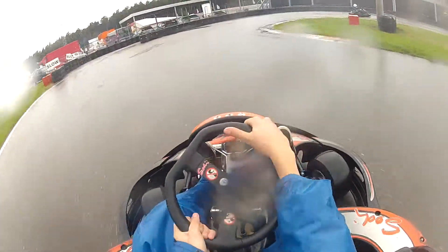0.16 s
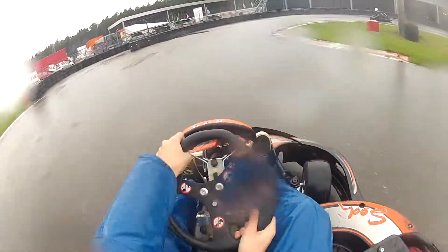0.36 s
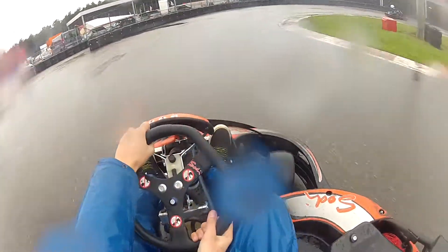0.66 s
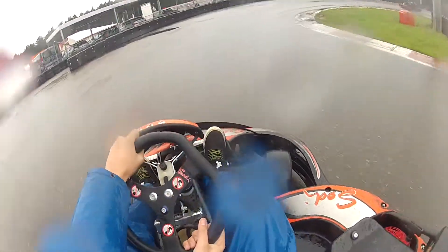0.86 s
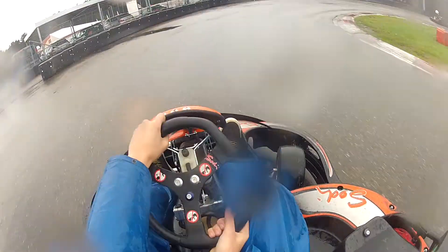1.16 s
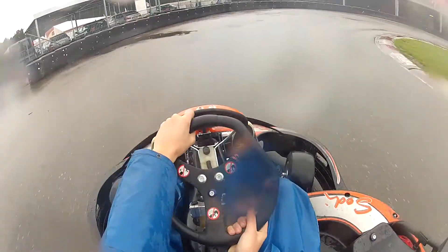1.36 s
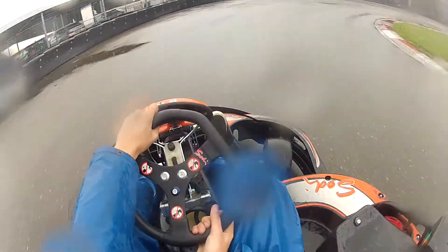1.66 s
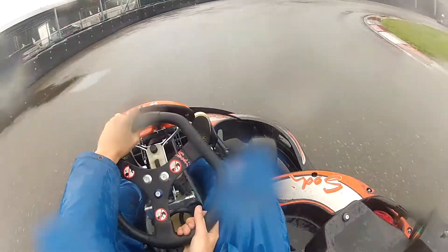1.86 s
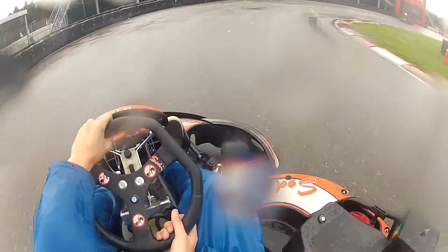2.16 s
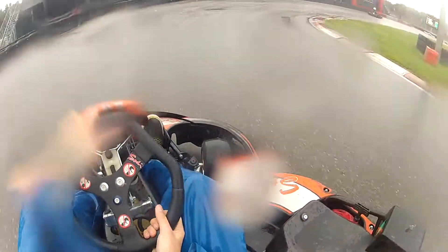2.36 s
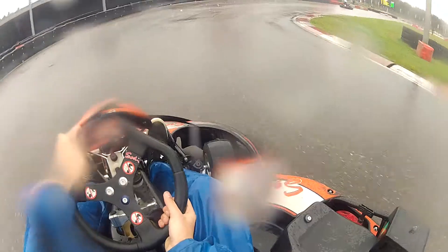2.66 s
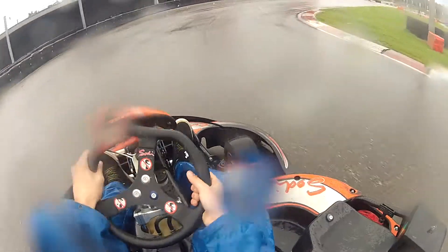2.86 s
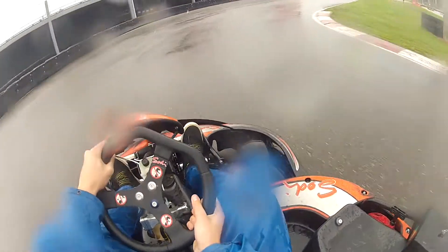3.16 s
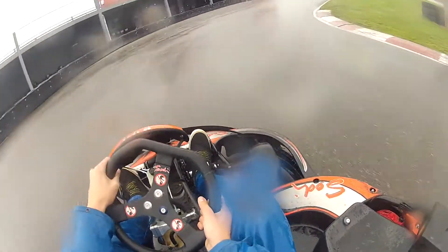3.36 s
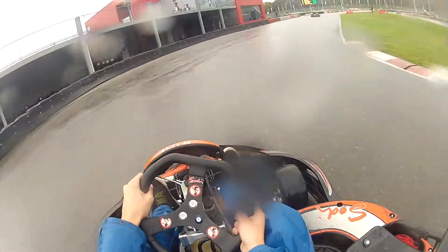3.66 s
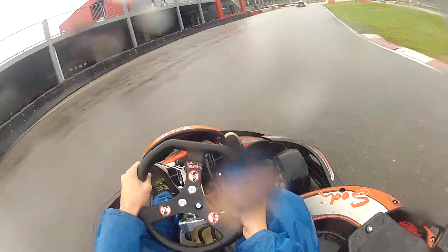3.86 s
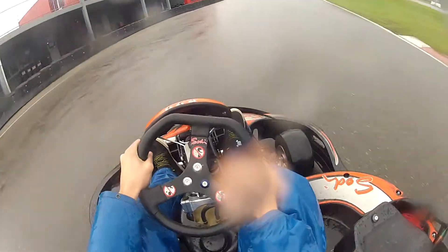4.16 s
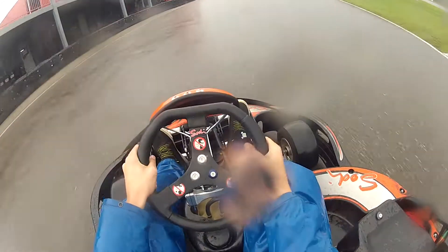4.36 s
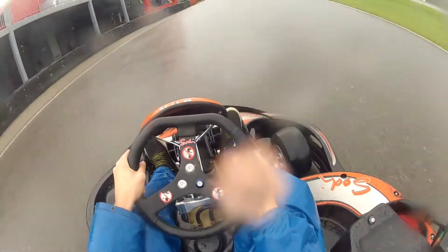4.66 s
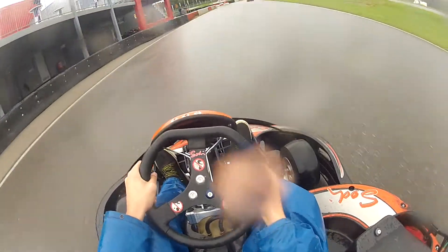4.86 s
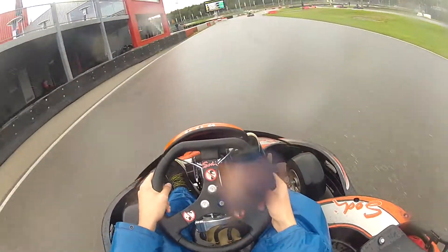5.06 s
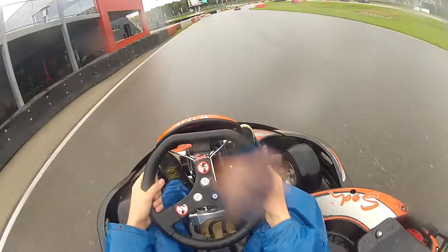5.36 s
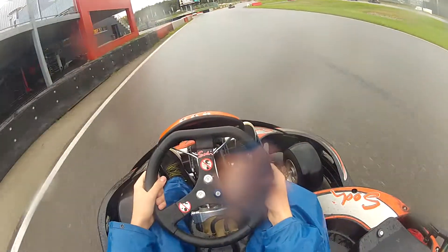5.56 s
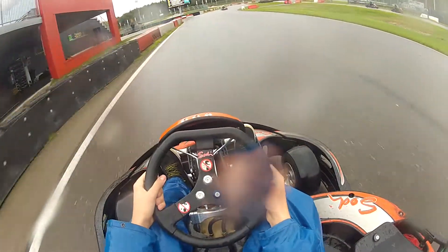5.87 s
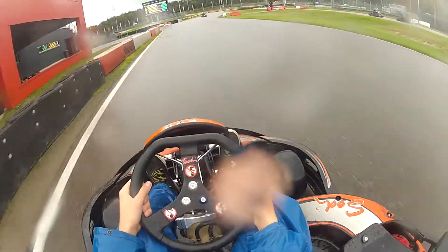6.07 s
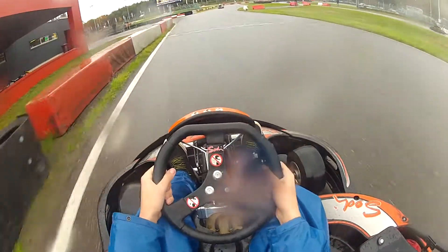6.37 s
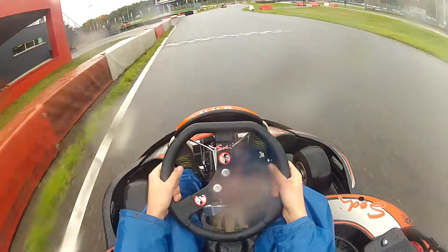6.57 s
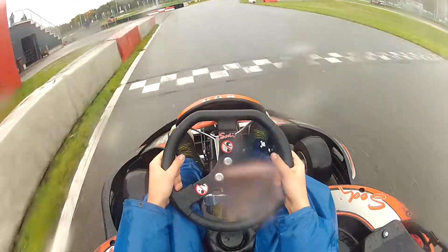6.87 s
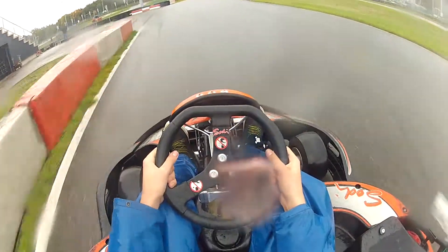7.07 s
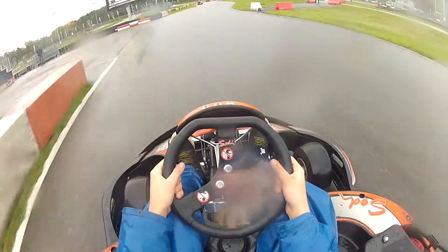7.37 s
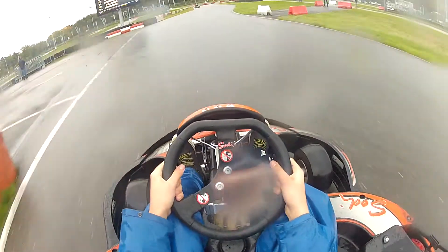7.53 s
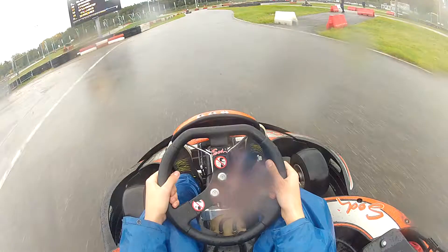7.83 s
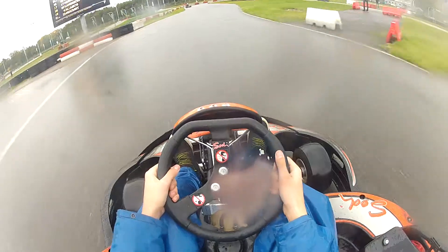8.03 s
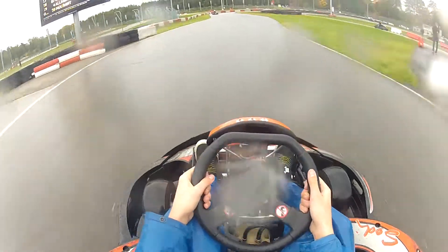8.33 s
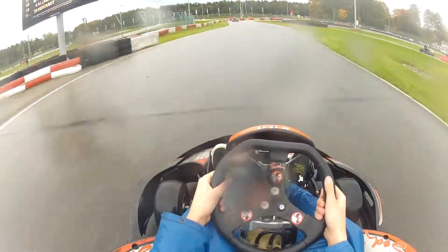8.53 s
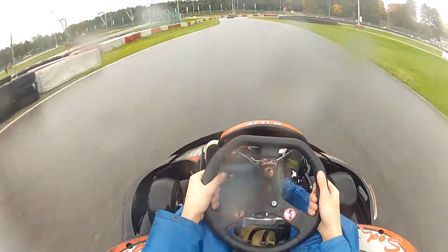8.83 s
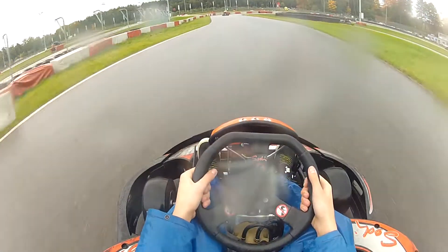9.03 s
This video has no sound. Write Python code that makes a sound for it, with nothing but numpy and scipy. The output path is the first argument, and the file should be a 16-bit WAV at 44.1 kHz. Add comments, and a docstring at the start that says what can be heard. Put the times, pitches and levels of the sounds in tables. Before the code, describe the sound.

Heard close up from a microphone riding with the driver, a go-kart runs on a wet track. The engine revs for a moment, falls back to a quiet, lumpy putter, then opens up and holds a rattling drone before rising further. Scattered small ticks, a whining chain and soft tyre spray sit underneath. As speed and rumble build, bumps clack and thump the microphone's mount several times in quick succession.

```python
"""Kart on a wet track

A four-stroke single, heard from a cased camera riding with the driver. The engine pulls, drops to idle
for a corner, then pulls against its slipping clutch until the clutch grips and the revs climb.
Gas puffs sound the exhaust; pistons, valves and firings ring the block. The chain whines up with
wheelspin and road speed, the tyres spray, and at speed bumps knock the camera in its mount."""
import sys
import numpy as np
from scipy import signal
from scipy.fft import rfft, irfft, next_fast_len
from scipy.io import wavfile
from scipy.ndimage import map_coordinates

SR = 44100
rng = np.random.default_rng(int(sys.argv[2]) if len(sys.argv) > 2 else 0)


def to_wav(s):
    """Save 16-bit WAV."""
    ch = np.atleast_2d(s).T  # columns
    pcm = np.round(np.clip(ch, -1, 1) * 32767)  # PCM
    wavfile.write(sys.argv[1], SR, pcm.astype(np.int16))


N = 405719
TIME = np.arange(N) / SR

# block clatter spectrum: f/Hz, level/dB
CLATTER_SPECTRUM = [(150, -66), (400, -6), (700, -1.5), (830, -9), (950, 0.5), (1500, -2.5), (2720, -7.5),
                    (2950, -9), (4300, -13), (5400, -16.5), (6100, -30), (6700, -17.5), (10500, -17),
                    (12000, -17), (14000, -18)]
# resonances of engine block and camera case: f/Hz, width/Hz, lift/dB
BLOCK_MODES = [(995, 77, 3.4), (1790, 55, 8.9), (2100, 130, 9.3), (2425, 250, 5.1), (3590, 560, 3.4)]
CASE_MODES = [(8340, 470, 8.5), (9780, 720, 9.5), (14200, 360, 11)]


def from_db(db):
    """Decibels to gain."""
    return 10 ** (np.asarray(db) / 20)


def unit_rms(x):
    """Scale to unit power."""
    return x / np.sqrt(np.mean(x ** 2) + 1e-20)


def curve(rows, x=TIME):
    """Interpolate a two-column table."""
    return np.interp(x, *np.transpose(rows))


def bell(t_s, half_s):
    """Gaussian swell of height 1."""
    return np.exp(-((TIME - t_s) / half_s) ** 2)


def drift(rate_hz):
    """Smooth random wander, unit spread."""
    knots = rng.standard_normal(int(N / SR * rate_hz) + 4)
    return unit_rms(map_coordinates(knots, [TIME * rate_hz], order=2, mode="nearest"))


def colour(x, spectrum, resonances=()):
    """Shape by a smooth spectrum plus bell-shaped resonances; unit power."""
    size = next_fast_len(N + SR // 4)
    hz = np.maximum(np.fft.rfftfreq(size, 1 / SR), 1)
    points_hz, levels_db = np.transpose(spectrum)
    db = np.interp(np.log(hz), np.log(points_hz), levels_db)
    for centre_hz, width_hz, lift_db in resonances:
        db += lift_db * np.exp(-2 * ((hz - centre_hz) / width_hz) ** 2)
    rolloff = 1 / (1 + (points_hz[0] / 2 / hz) ** 2) / (1 + (hz / 2 / points_hz[-1]) ** 2)
    return unit_rms(irfft(rfft(x, size) * from_db(db) * rolloff, size)[:N])


def butter(x, hz, kind):
    """Butterworth filter, order 2."""
    return signal.sosfilt(signal.butter(2, hz, kind, fs=SR, output="sos"), x)


def narrow_noise(hz, width_hz):
    """Noise through one resonance; unit power."""
    return unit_rms(butter(rng.standard_normal(N), [hz - width_hz / 2, hz + width_hz / 2], "band"))


def clicks(times_s, gains):
    """Single-sample impulses."""
    return np.bincount(np.clip(np.asarray(times_s) * SR, 0, N - 1).astype(int), gains, N) + 1e-18


def fade(x, decay_s):
    """Give each impulse an exponential tail."""
    return signal.lfilter([1], [1, -np.exp(-1 / (decay_s * SR))], x)


def ring(x, hz, t60_s):
    """Give each impulse a decaying sine."""
    r, w = from_db(-60 / (t60_s * SR)), 2 * np.pi * hz / SR
    return signal.lfilter([0, np.sin(w)], [1, -2 * r * np.cos(w), r * r], x)


def rev_gain(firing_hz, load, db, doubling_db, shut_db):
    """Gain rising with revs: db at 28 firings/s, full load; shut_db added at no load."""
    return from_db(db + doubling_db * np.log2(firing_hz / 28) + shut_db * (1 - load))


def speed_gain(mesh_hz, db, doubling_db):
    """Gain rising with road speed: db at 784 teeth/s."""
    return from_db(db + doubling_db * np.log2(mesh_hz / 784))


def motion():
    """The engine runs free until the sprocket catches up and the clutch grips."""
    # firing rate, clutch open or slipping: t/s, f/Hz
    free_revs = [(0, 21.36), (.19, 25.65), (.38, 27.01), (.523, 25.27), (.877, 15.5), (1.62, 15.55),
                 (1.88, 13.5), (2.29, 16.85), (2.522, 23.48), (2.745, 26.22), (3.2, 27.2), (3.48, 27.01),
                 (3.94, 27.9)]
    # road speed as tooth mesh rate: t/s, f/Hz
    road_speed = [(0, 400), (.4, 420), (2.3, 330), (3.5, 450), (4.7, 528), (5.3, 592), (6.6, 722),
                  (7.6, 818), (8.4, 885), (9.2, 942)]
    # throttle pedal: pressed/s, lifted/s
    pedal = [(-1, .39), (2.23, 10)]
    teeth_per_firing, grip_hz = 28, .65
    open_s, shut_s, overrun_s = .24, .06, .33
    mesh_hz = curve(road_speed)
    locked_hz = mesh_hz / teeth_per_firing
    firing_hz = grip_hz * np.logaddexp(curve(free_revs) / grip_hz, locked_hz / grip_hz)  # soft maximum
    load = sum(np.interp(TIME, [down, down + open_s, up, up + shut_s], [0, 1, 1, 0])
               for down, up in pedal)
    slip = load * (1 - locked_hz / firing_hz)
    lift_s = pedal[0][1]
    overrun = np.interp(TIME, [lift_s, lift_s + overrun_s], [.5, 0])  # exhaust burbles on
    gas_flow = np.maximum(load, overrun)
    return firing_hz, mesh_hz, load, slip, gas_flow


def exhaust(cycles, firing_hz, load, uneven_db=.36, idle_uneven_db=2.5, waver_db=2):
    """Gas puffs make harmonics that slide through the silencer's resonances; dull and uneven at idle."""
    # gas puffs: place/cycle, strength
    puffs = [(0.252, 0.46), (0.409, 0.21), (0.715, 0.82), (0.9, 0.39)]
    # one row per harmonic: ratio (unused), low-rev level/dB, high-rev level/dB
    harmonics = [(1, -5, -4), (2.01, 9, 9.5), (3.006, 4.5, 0.5), (3.94, -23, -25), (5, -5, 1),
                 (6.05, 6, 6.5), (7.04, 1, 3.5), (8.05, -2, -1), (9, -1.5, 2), (10, 3, -12), (10.92, 3, 4),
                 (12, -1, -9), (13.07, 5, -1), (14.06, 1, 4.5), (15, -1, -4), (16.16, 3.5, 4),
                 (17.1, 2.5, 4), (18.02, 0, -9), (18.95, 1.5, 0), (20.06, 1.5, 4), (21, -9.5, -9),
                 (22.03, -2.5, -3), (22.95, -4, -3), (24.1, -5, -3), (24.9, -4.5, 3), (26.14, -20, -2),
                 (27.1, -5, -11), (28, -17, -10), (29, -17, -14), (30, -19, -14), (31, -14, -9),
                 (31.9, -4, 2), (33, -11, 2.5)]
    # silencer and air box response: f/Hz, level/dB
    silencer = [(30, -22), (58, -9.5), (85, 6.5), (115, -5), (180, -1.5), (230, 0.5), (295, 5), (345, -1.5),
                (420, 0.5), (490, -5), (555, 3.5), (610, -6.5), (700, -10.5), (800, -11.5)]
    boom_hz, shut_db_per_octave = 80, -2.5
    place, strength = np.transpose(puffs)
    high_revs = np.interp(firing_hz, [27.2, 27.8], [0, 1])
    note = np.zeros(N)
    for k, (_, low_db, high_db) in enumerate(harmonics, 1):
        phase = np.angle(strength @ np.exp(-2j * np.pi * k * place))
        db = low_db + (high_db - low_db) * high_revs + curve(silencer, k * firing_hz)
        db += shut_db_per_octave * (1 - load) * np.log2(np.maximum(k * firing_hz / boom_hz, 1))
        waver = np.interp(TIME, np.linspace(0, TIME[-1], 60), rng.standard_normal(60))
        note -= from_db(db + waver_db * waver) * np.cos(2 * np.pi * k * cycles + phase)
    burn = np.interp(cycles, np.arange(300), rng.standard_normal(300))
    return unit_rms(note) * from_db(burn * (uneven_db + idle_uneven_db * (1 - load)))


def clatter(cycles, slip, uneven_db=1.4, jitter_s=3e-5, rise_s=.0015, repeat_db=-1.5, steady_db=-6.5):
    """Knocks ring the block, part alike each cycle, part fresh rattle. Slap stands out under slip."""
    # piston slap, rebound, exhaust valve, intake valve:
    # place/cycle, level/dB, decay/s, change at full slip/dB
    knocks = [(.22, 3.5, 0.0073, -2), (.45, 1, 0.0074, -8.5), (.72, 0.5, 0.0079, -11),
              (.97, 0.5, 0.0066, -19)]
    count = np.arange(int(cycles[-1]))
    repeating, power = np.zeros(N), np.zeros(N)
    tail_s = TIME[:SR // 16]
    for place, db, decay_s, slip_db in knocks:
        timing, force = rng.standard_normal((300, 2))[count].T
        times_s = np.interp(count + place, cycles, TIME) + jitter_s * timing
        hits = clicks(times_s, from_db(db + slip_db * np.interp(times_s, TIME, slip) + uneven_db * force))
        burst = (1 - np.exp(-tail_s / rise_s)) * np.exp(-tail_s / decay_s)
        repeating += signal.oaconvolve(hits, rng.standard_normal(len(tail_s)) * burst)[:N]
        power += signal.oaconvolve(hits ** 2, burst ** 2)[:N]
    rattle = np.sqrt(np.abs(power) + from_db(steady_db) ** 2) * rng.standard_normal(N)
    return colour(rattle + from_db(repeat_db) * repeating, CLATTER_SPECTRUM, BLOCK_MODES + CASE_MODES)


def combustion(cycles, load, place=.165, level_db=-9.5, uneven_db=1, jitter_s=1e-4, idle_db=-9):
    """Each firing's pressure jump rings the cylinder, harder under load."""
    # cylinder modes: f/Hz, level/dB, t60/s
    modes = [(1755, 5.5, 0.044), (1972, 10, 0.049), (2220, 10, 0.01), (2228, 5, 0.062), (2660, 6.5, 0.053),
             (3600, -16, 0.016)]
    count = np.arange(int(cycles[-1]))
    timing, force = rng.standard_normal((300, 2))[count].T
    times_s = np.interp(count + place, cycles, TIME) + jitter_s * timing
    force_db = level_db + uneven_db * force + idle_db * (1 - np.interp(times_s, TIME, load))
    out = np.zeros(N)
    for k, (hz, db, t60_s) in enumerate(modes):
        scatter_db = 3 * rng.standard_normal(300)[count]
        out += (-1) ** k * ring(clicks(times_s, from_db(force_db + db + scatter_db)), hz, t60_s)
    return out


def rocker_taps(cycles, width_cycles=.079):
    """Envelope of four rocker taps a cycle, varying in strength."""
    # taps: place/cycle, level/dB
    taps = [(0.28, -1), (0.51, -2), (0.723, -1), (.01, -3)]
    envelope = np.zeros(N)
    for place, db in taps:
        distance = np.sin(np.pi * (cycles - place)) / (2 * np.pi * width_cycles)
        envelope += from_db(db + drift(25)) * np.exp(-2 * distance ** 2)
    return envelope


def rocker_cover(tapping, level_db=-12.5, waver_db=2.5, between_taps=.3):
    """Each tap rings the cover; a little ring remains between taps."""
    ringing = unit_rms((between_taps + tapping) * narrow_noise(hz=3665, width_hz=310))
    return ringing * from_db(level_db + waver_db * drift(5.5))


def valve_gear(cycles, level_db=-45.5, swing_db=3.5, place=.25):
    """Light rattle at any load, swelling once per crank turn."""
    # rattle: f/Hz, level/dB
    spectrum = [(200, 6), (330, 5.5), (450, 1.5), (560, 4.5), (800, -18), (1050, -0.5), (1600, -14),
                (2250, -1.5), (3000, -13), (3650, -1), (4400, -16), (6000, -52)]
    swell = from_db(swing_db * np.cos(4 * np.pi * (cycles - place)))
    return from_db(level_db) * colour(swell * rng.standard_normal(N), spectrum)


def chain(cycles, mesh_hz, wobble_hz=2, flutter_db=.5, throb=.51, spin_db=3.5):
    """Links meet the sprocket in a rough whine: surging each firing, higher and louder in wheelspin."""
    # wheelspin on the wet: t/s, added mesh rate/Hz
    wheelspin = [(0, 140), (.08, 190), (.17, 232), (.28, 268), (.38, 240), (.45, 178), (.53, 185),
                 (.58, 110), (.64, 0)]
    # whine and its octave through the guard's resonances: mesh rate/Hz, level/dB
    fundamental = [(330, -75), (560, -44.5), (600, -46), (660, -42), (690, -48), (740, -44), (790, -34),
                   (835, -39.5), (905, -32), (950, -42)]
    octave = [(330, -75), (500, -59), (535, -39.5), (565, -49.5), (600, -53), (690, -47), (765, -39.5),
              (800, -45), (840, -43), (875, -36), (915, -54)]
    spin_hz = curve(wheelspin)
    whine_hz = mesh_hz + spin_hz
    phase = 2 * np.pi * np.cumsum(whine_hz + wobble_hz * drift(45)) / SR
    whine = sum(from_db(curve(levels, whine_hz) - flutter_db * drift(25)) * np.sin(k * phase)
                for k, levels in enumerate((fundamental, octave), 1))
    surge = 1 + throb * np.cos(2 * np.pi * cycles)
    return whine * surge * from_db(spin_db * (spin_hz / spin_hz.max()) ** 2)


def drive_ring(tapping, waver_db=.5):
    """A thin steel drive part rings in time with the engine, in swells."""
    # swells: t/s, half length/s, lift/dB
    swells = [(3.374, 0.25, 5.5), (4.65, 0.45, 1), (7.35, 0.65, 5.5)]
    swell_db = sum(db * bell(t_s, half_s) for t_s, half_s, db in swells)
    ringing = unit_rms(tapping * narrow_noise(hz=2403, width_hz=214))
    return ringing * from_db(swell_db + waver_db * drift(8))


def sprocket(cycles, swing_db=2, place=.33):
    """Rollers keep the sprocket ringing, most when a firing snatches the chain."""
    snatch = from_db(swing_db * np.cos(2 * np.pi * (cycles - place)))
    return snatch * narrow_noise(hz=2036, width_hz=220)


def spray(grain_db=2):
    """Fine water off the tyres: grainy hiss."""
    # hiss: f/Hz, level/dB
    spectrum = [(500, 8.5), (3500, 6), (5300, 6), (6100, -9), (6800, 5), (11000, -4), (15000, -1)]
    return colour(rng.standard_normal(N) * from_db(grain_db * drift(900)), spectrum, CASE_MODES)


def chassis(firing_hz, mesh_hz, load, lumpy_db=2.5):
    """Frame rumble, seat boom, mount shudder: engine-driven at first, by air and road at speed."""
    # frame and mount spectra: f/Hz, level/dB
    frame_spectrum = [(15, -26), (28, -29), (40, -22), (52, 2), (64, -17.5), (100, -24), (200, -28),
                      (600, -36)]
    mount_spectrum = [(50, 0), (98, -6), (124, 3), (150, 0), (186, 6), (225, -5), (275, 3.5), (340, -2.5),
                      (480, -33), (650, -15), (900, -12), (2000, -41)]
    # swells and ebbs: t/s, half length/s, rumble/dB, boom/dB, shudder/dB
    swells = [(.1, .12, -6, 6, 2), (.42, 0.13, 1, 11, 5), (0.727, .14, 2, 8.5, 1.5),
              (2.15, 0.23, -2, -10, 1.5), (2.85, .2, 6, -0.5, 8), (3.7, 0.56, 3, 3, 1.5),
              (5.15, 0.29, 9.5, -9, .5), (5.617, 0.25, 3, -6, 5), (6.606, 0.061, 3, 8, 2),
              (7.5, 0.49, 2.5, 0.5, -2), (9.125, 0.16, 0.5, -4, -9.5)]
    rumble = colour(rng.standard_normal(N), frame_spectrum)
    boom = narrow_noise(hz=78.7, width_hz=14.7)
    shudder = colour(rng.standard_normal(N) * from_db(lumpy_db * drift(70)), mount_spectrum)
    rumble *= np.hypot(rev_gain(firing_hz, load, db=-38.5, doubling_db=13.5, shut_db=0),
                       speed_gain(mesh_hz, db=-30, doubling_db=35))
    boom *= np.hypot(rev_gain(firing_hz, load, db=-42, doubling_db=11.5, shut_db=1.5),
                     speed_gain(mesh_hz, db=-32, doubling_db=27))
    shudder *= np.hypot(rev_gain(firing_hz, load, db=-42, doubling_db=3, shut_db=-1),
                        speed_gain(mesh_hz, db=-31, doubling_db=30.5))
    rumble_db, boom_db, shudder_db = sum(np.outer(lifts_db, bell(t_s, half_s))
                                         for t_s, half_s, *lifts_db in swells)
    return from_db(rumble_db) * rumble + from_db(boom_db) * boom + from_db(shudder_db) * shudder


def squeaks():
    """Short swells of one hoarse resonance on turning into the corner."""
    # squeaks: t/s, half length/s, level/dB
    events = [(.765, .025, -45), (.87, .012, -53)]
    envelope = sum(from_db(db) * bell(t_s, half_s) for t_s, half_s, db in events)
    return envelope * narrow_noise(hz=1310, width_hz=130)


def ticks(gain_db=2.5):
    """Short ticks, clicks and splashes on the kart: very short noise bursts."""
    # ticks: t/s, level/dB, decay/s
    events = [(1.185, -41.5, .008), (1.804, -40.5, .006), (1.84, -37, .004), (2.0, -35, 0.0022),
              (2.1183, -33, 0.0032), (2.2027, -30, 0.0019), (2.292, -30, 0.0014), (2.358, -37, 0.009),
              (2.594, -27.5, .005), (3.01, -29, 0.0015), (3.689, -28, 0.0099), (5.109, -26.5, 0.0011),
              (6.113, -22, 0.00098)]
    envelope = sum(fade(clicks([t_s], [from_db(db)]), decay_s) for t_s, db, decay_s in events)
    bursts = envelope * rng.standard_normal(N)
    return from_db(gain_db) * bursts.std() * colour(bursts, CLATTER_SPECTRUM, BLOCK_MODES + CASE_MODES)


def mount_mode(hz, db, t60_s, spread):
    """One decaying mode, randomly detuned: the mount never seats the same way twice."""
    tail_s = TIME[:SR // 4]
    detuned_hz = hz * (1 + spread * rng.standard_normal())
    return from_db(db - 60 * tail_s / t60_s) * np.sin(2 * np.pi * detuned_hz * tail_s)


def bumps(mount_gain_db=1.5, crack_gain_db=-5.5, buzz_gain_db=-12.5, vary_db=2, spread=.042):
    """Bumps clack the mount, crack if hard, and leave it swinging with a thud; the case buzzes."""
    # bumps: t/s, clack/dB, crack/dB, thud/dB, thud t60/s
    events = [(6.579, -28, -45, -34, .1), (6.898, -24, -40, -18, 0.22), (7.078, -5, -12, -7.5, 0.15),
              (7.446, -34, -45, -16, 0.14), (7.654, -24, -40, -17, 0.2), (7.852, -21, -32, -17.5, 0.19),
              (7.946, -9, -9, -9, 0.16), (8.02, -13, -17, -12.5, 0.1), (8.077, -15, -23, -10, 0.16),
              (8.2679, -1.5, -8.5, -4, .1), (8.312, -22, -36, -14, .05), (8.3499, -5, -11, -5.5, 0.15),
              (8.488, -15, -22, -12.5, .087), (8.627, -2.5, -2.5, -5, 0.09), (8.81, -3, 1.5, -3.5, 0.12),
              (8.83, -7, -24, -5, 0.094), (8.8469, 0.5, -2, -1, 0.14), (8.868, -6.5, -22, -7, 0.086),
              (8.904, -10, -17, -10, 0.11)]
    # mount's thud modes: f/Hz, level/dB, share of t60
    thud_modes = [(122, -11, 0.67), (174, -6, 0.75), (270.5, 0, 0.97)]
    # mount's clack modes: f/Hz, level/dB, t60/s, sign of first swing
    clack_modes = [(567, -3, 0.02, 1), (737, -1, 0.019, -1), (930, -19, 0.01, -1)]
    # dry crack: f/Hz, level/dB
    crack_spectrum = [(700, -5), (1150, 2), (1500, -21), (2000, -5), (2800, -36), (4000, -32), (8000, -49)]
    touch_lead_s, touch_db = .0017, -8.5  # light contact before the mount hits home
    mount = np.zeros(N + SR)
    for t_s, clack_db, _, thud_db, thud_t60_s in events:
        strikes_db = clack_db + vary_db * rng.standard_normal(len(clack_modes))
        thud = sum(mount_mode(hz, thud_db + db, thud_t60_s * share, spread / 2)
                   for hz, db, share in thud_modes)
        clack = sum(sign * mount_mode(hz, strike_db + db, t60_s, spread)
                    for (hz, db, t60_s, sign), strike_db in zip(clack_modes, strikes_db))
        hit, touch = int(t_s * SR), int((t_s - touch_lead_s) * SR)
        mount[hit:hit + len(clack)] += thud + clack
        mount[touch:touch + len(clack)] += from_db(touch_db) * clack
    times_s, clacks_db, cracks_db = np.transpose(events)[:3]
    crack = fade(clicks(times_s, from_db(cracks_db)), decay_s=.0015) * rng.standard_normal(N)
    buzz = fade(clicks(times_s, from_db(clacks_db)), decay_s=.0073) * rng.standard_normal(N)
    return (from_db(mount_gain_db) * butter(mount[:N], 2400, "low")
            + from_db(crack_gain_db) * crack.std() * colour(crack, crack_spectrum)
            + from_db(buzz_gain_db) * butter(buzz, [11000, 13000], "band"))


def scene():
    """Engine, drive, water and road at the camera; mono."""
    firing_hz, mesh_hz, load, slip, gas_flow = motion()
    cycles = np.cumsum(firing_hz) / SR
    note = exhaust(cycles, firing_hz, load)
    block = clatter(cycles, slip) + combustion(cycles, load)
    tapping = rocker_taps(cycles)
    rattle = block + rocker_cover(tapping)
    engine = (rev_gain(firing_hz, gas_flow, db=-29.5, doubling_db=6.5, shut_db=-14) * note
              + rev_gain(firing_hz, load, db=-34, doubling_db=8, shut_db=-9) * rattle
              + valve_gear(cycles))
    drive = (chain(cycles, mesh_hz)
             + rev_gain(firing_hz, load, db=-45, doubling_db=10, shut_db=-6) * drive_ring(tapping)
             + speed_gain(mesh_hz, db=-40, doubling_db=12) * sprocket(cycles))
    water = speed_gain(mesh_hz, db=-44, doubling_db=8) * spray()
    return (engine + drive + water + ticks() + bumps() + squeaks()
            + chassis(firing_hz, mesh_hz, load))[None]


def limiter(x, threshold_db=-1, attack_s=.0018, release_db_per_s=54):
    """Peaks pull the gain down fast; it recovers slowly."""
    over_db = np.maximum(20 * np.log10(np.abs(x) + 1e-9) - threshold_db, 0)
    release_db = release_db_per_s * TIME
    held_db = np.maximum.accumulate(over_db + release_db, axis=-1) - release_db
    pole = np.exp(-1 / (attack_s * SR))
    return x * from_db(-signal.lfilter([1 - pole], [1, -pole], held_db))


def record(dry):
    """The camera limits, clips the biggest peaks and cuts the top."""
    cutoff_hz = 15300
    clipped = np.clip(limiter(dry), -.7, .7)
    return signal.sosfilt(signal.ellip(10, .2, 80, cutoff_hz, fs=SR, output="sos"), clipped)


dry = scene()
out = record(dry)
to_wav(out)
```